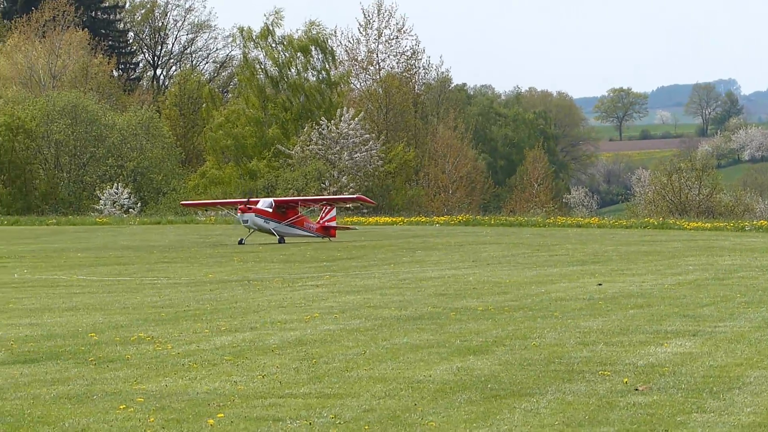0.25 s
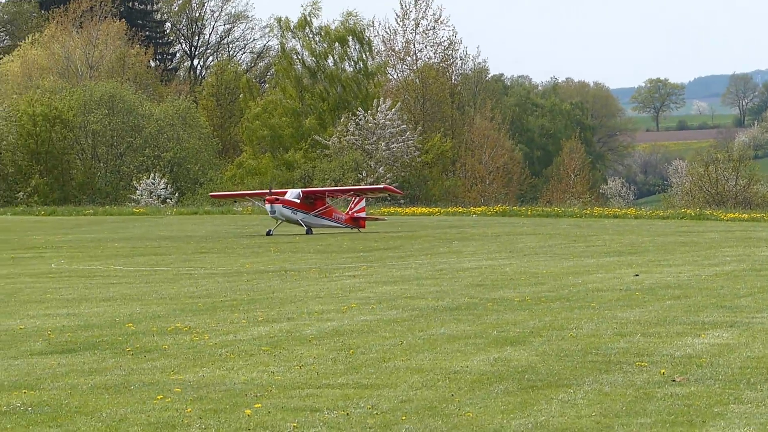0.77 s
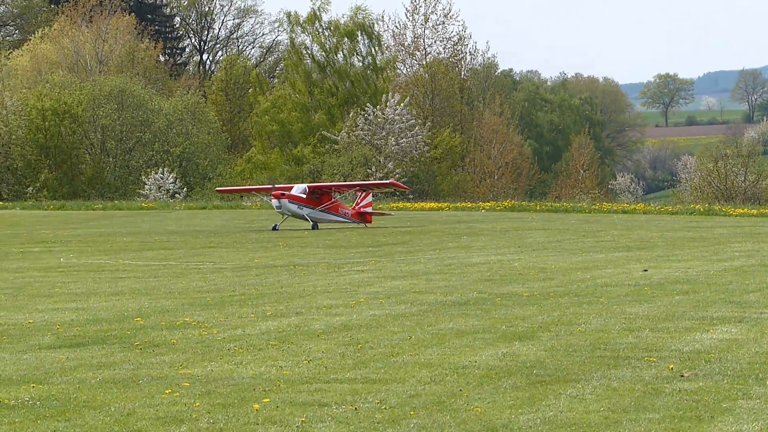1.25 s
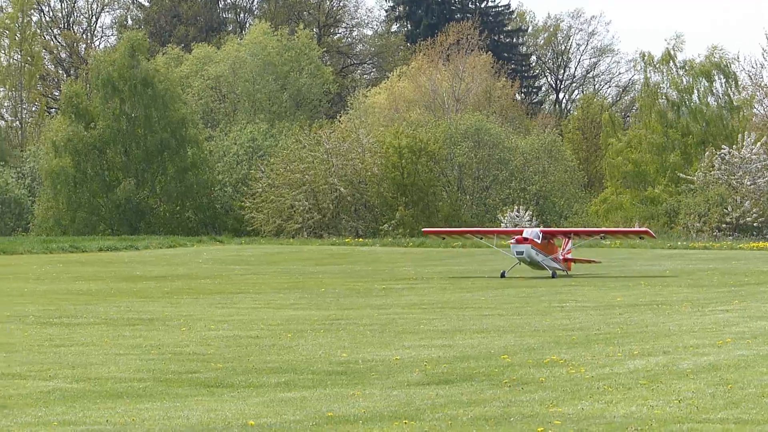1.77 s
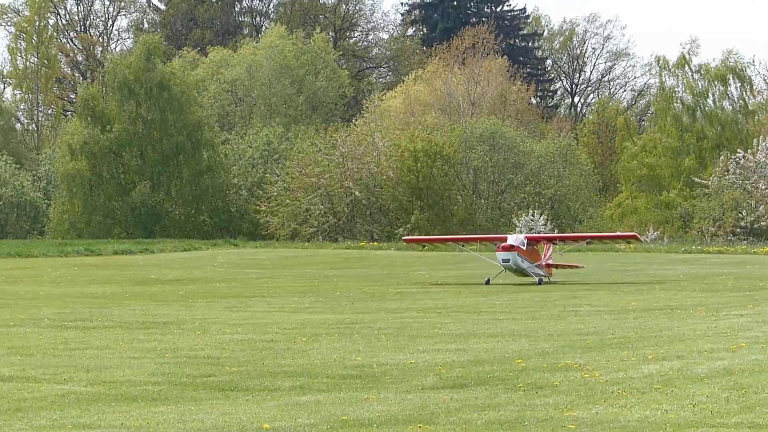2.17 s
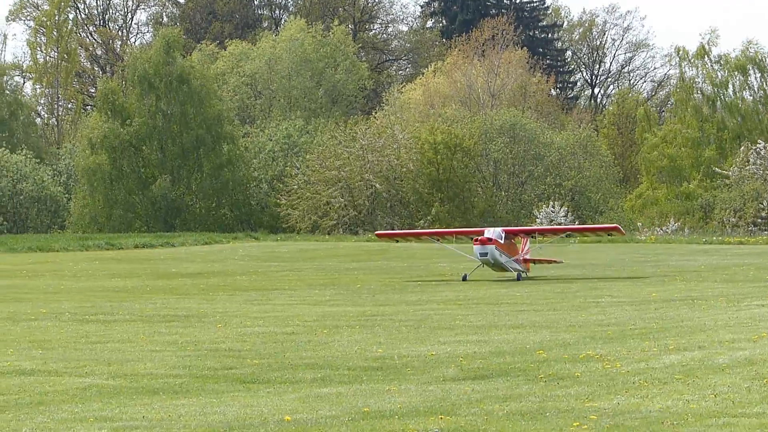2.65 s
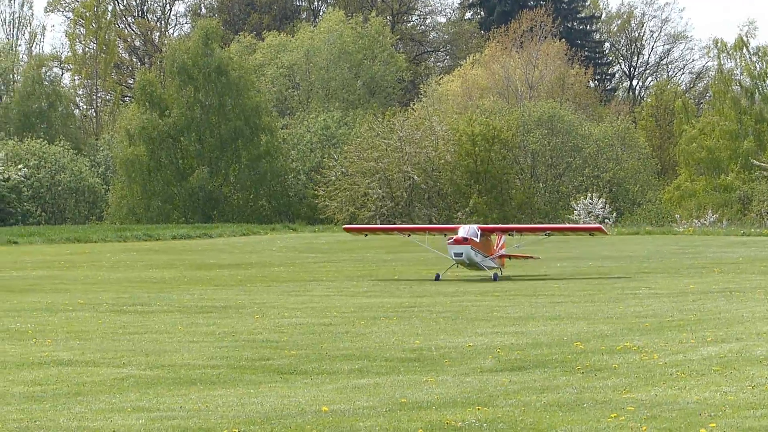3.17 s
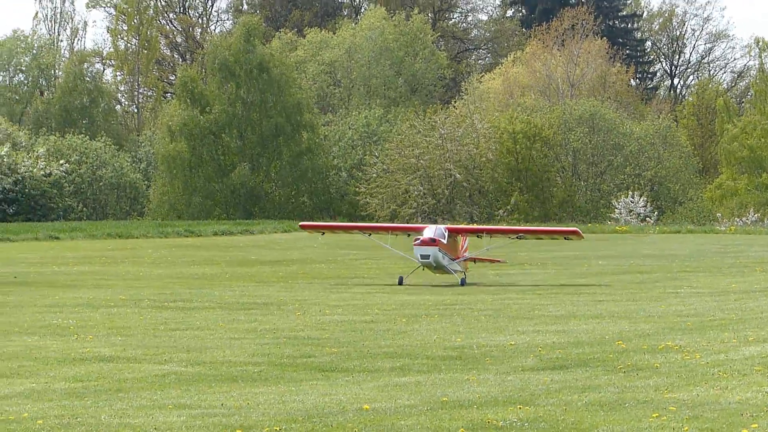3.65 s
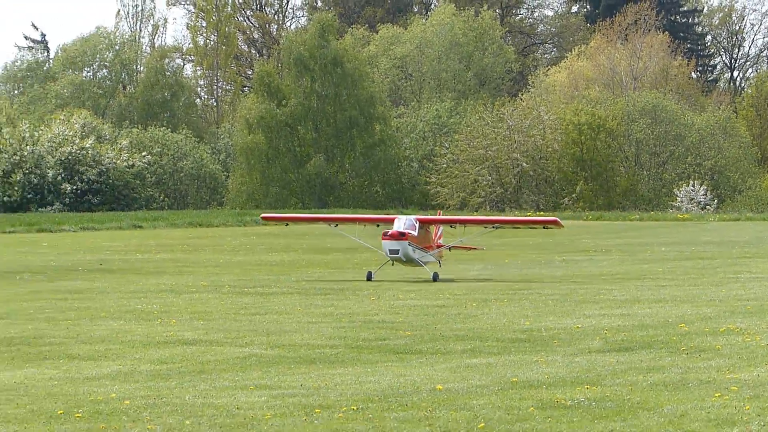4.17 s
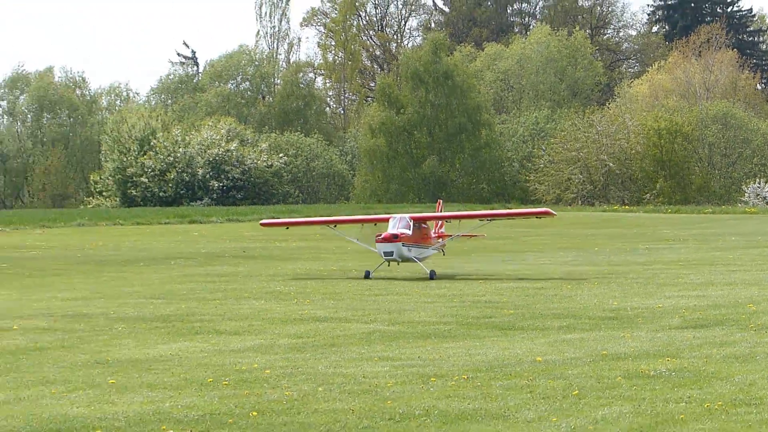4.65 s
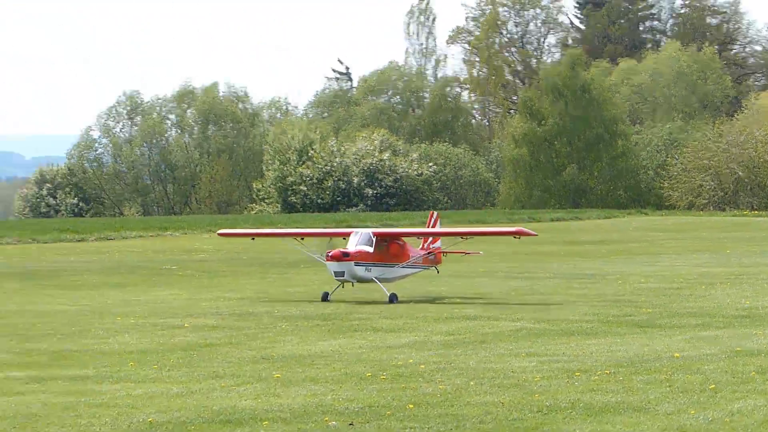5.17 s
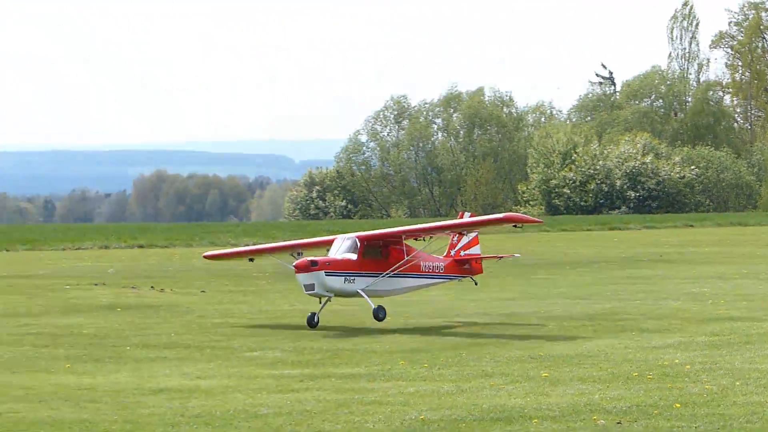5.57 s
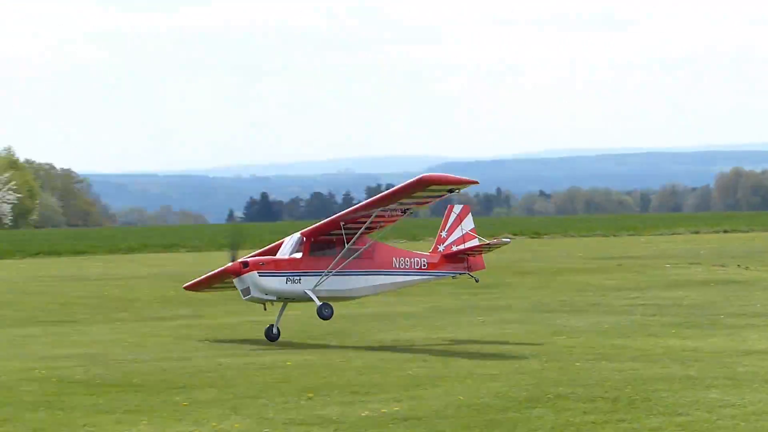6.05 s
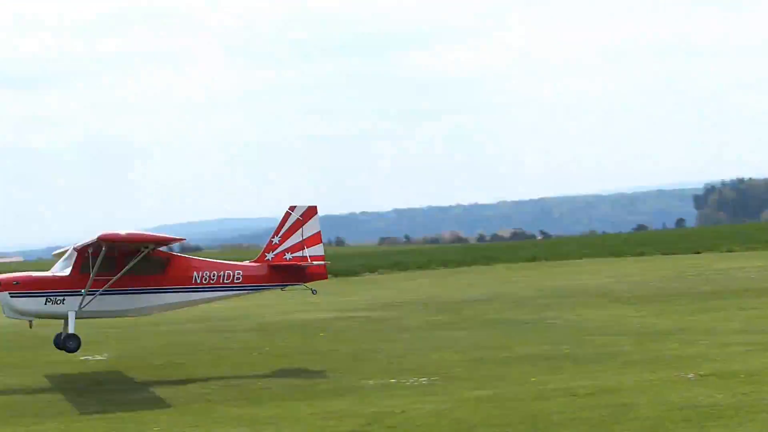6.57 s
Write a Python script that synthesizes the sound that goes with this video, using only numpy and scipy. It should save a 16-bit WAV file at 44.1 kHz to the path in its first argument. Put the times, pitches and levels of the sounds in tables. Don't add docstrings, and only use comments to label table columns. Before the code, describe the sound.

Wind gusts and sparse bird calls, a brief dead silence, then a petrol model plane revs up, swelling into a loud rasping pass.

```python
import sys
import numpy as np
from scipy import signal
from scipy.fft import rfft, irfft
from scipy.io import wavfile
from scipy.ndimage import uniform_filter1d

SR = 44100
rng = np.random.default_rng(int(sys.argv[2]) if len(sys.argv) > 2 else 0)


def how_loud(loudness_db):
    steps = np.asarray(loudness_db, float) / 20
    return 10 ** steps


def put_to_file(sound):
    columns = np.atleast_2d(sound).T
    safe = np.clip(columns, -1, 1)
    whole_steps = np.round(safe * 32767)
    wavfile.write(sys.argv[1], SR, whole_steps.astype(np.int16))


N = 300321
TIME = np.arange(N) / SR
CUT_S, RESUME_S = 1.3545, 1.6152

# time in seconds, shaft speed in turns per second.
SHAFT_SPEED = [(1.63, 49.5), (1.87, 51.1), (2.17, 54.1), (2.41, 55.3), (2.71, 58.6), (2.98, 62.9),
               (3.1, 63.7), (3.46, 64.8), (3.67, 66.9), (3.9, 70.3), (4.15, 69.9), (4.51, 70.4),
               (4.8, 72.7), (5.11, 77.3), (5.45, 85.6), (5.75, 88.3), (6.15, 89.9), (6.81, 87.6)]
# time in seconds, excess in dB.
HARD_FIRINGS = [(5.55, 3), (5.63, 4), (5.701, 6.5), (5.75, 3.5), (5.828, 6), (5.93, 4), (6.021, 4.5),
                (6.16, 2.5), (6.39, 2), (6.53, 3.5), (6.59, 0), (6.68, -0.5)]


def plane():
    speed = columns(SHAFT_SPEED, TIME)[0]
    turns = np.cumsum(speed) / SR
    bark_db = sum(db * bump(TIME, s, .02) for s, db in HARD_FIRINGS)
    firing_db = 1.4 * rng.standard_normal(600)[turns.astype(int)]
    strength = how_loud(firing_db + bark_db)
    return exhaust_orders(speed, turns, strength) + blade_hiss(turns, strength, bark_db)


# frequency in Hz, rms level of one order in dB.
ORDER_COLOUR = [(530, -34.5), (720, -45), (800, -50), (1000, -49.5), (1250, -55), (1600, -50),
                (2500, -54.5), (4000, -58.5)]
ODD_DB, ODD_BELOW_HZ = -6.5, 940
VALLEY_HZ, VALLEY_OCTAVES, VALLEY_DB = 900, .3, -4


def exhaust_orders(speed, turns, strength):
    t = TIME[::256]
    fading, flutter = drift(1.5, 14, t, count=56), drift(5, 45, t, count=56)
    wobble = drift(3, 40, t, count=1)[0]
    level_db = np.zeros((56, len(t)))
    level_db[2:11] = low_orders_db(t)
    level_db[5:11] += 2.56 * fading[5:11]
    level_db[1] = np.maximum(level_db[2] - 31, level_db[6] - 19)
    hz = np.arange(11, 56)[:, None] * speed[::256]
    level_db[11:] = read(ORDER_COLOUR, hz) + body_db(hz) + reach_db(hz, t) + 2.3
    level_db[11:] += 3 * fading[11:] + VALLEY_DB * hill(hz, VALLEY_HZ, VALLEY_OCTAVES)
    level_db[11::2] += ODD_DB * (.5 - .5 * np.tanh(np.log2(hz[::2] / ODD_BELOW_HZ) / 0.18))
    shaken = turns + .0025 * np.interp(TIME, t, wobble)
    order = np.arange(56)
    lag = .6 * order + .012 * order ** 2 + .8 * rng.standard_normal(56)
    lines = []
    for k in range(1, 56):
        level = np.interp(TIME, t, how_loud(level_db[k] + 1.06 * flutter[k]))
        lines.append(level * np.cos(2 * np.pi * k * shaken - lag[k]))
    rasp = sum(lines[12:]) * uniform_filter1d(strength, 100)
    return np.sqrt(2) * (sum(lines[:12]) + rasp)


# frequency in Hz, spectral density in dB per Hz.
HISS = [(60, -33), (130, -17), (220, -6), (400, -15), (700, -9), (950, -22.5), (1500, -13.5), (2700, -17),
        (4500, -18.5), (6000, -18.5), (9500, -18), (12000, -25.5), (15400, -35)]
# frequency in Hz, left-right likeness from -1 to 1.
HISS_SAME = [(60, 0.15), (400, 0.28), (1200, 1), (2400, 0.99), (9000, 1), (12000, 0.95)]
BARK_HZ, BARK_OCTAVES, BARK_SHARE = 1770, 0.9, 1.57


def blade_hiss(turns, strength, bark_db):
    def colour_db(hz, t):
        clear_db = -2.5 * hill(hz + 1, 1400, 1)
        snap_db = BARK_SHARE * np.interp(t, TIME, bark_db) * hill(hz + 1, BARK_HZ, BARK_OCTAVES)
        waver_db = 0.76 * drift(5, 30, t, count=1)
        return read(HISS, hz) + clear_db + body_db(hz) + reach_db(hz, t) + snap_db + waver_db
    hiss = noise(1024, colour_db, patchy_db=2.3, same=lambda hz, t: read(HISS_SAME, hz))
    firing_pulse = .55 * strength * np.exp(-(turns % 1) / .25)
    blade_pulse = .4 * np.exp(-(2 * turns % 1) / .3)
    return how_loud(-6) * hiss * evened(.9 + firing_pulse + blade_pulse)


ORDER_DB = [-20, -32, -33.5, -44.5, -40, -43, -40, -44.5, -43]
# frequency in Hz, width in Hz, gain in dB.
SILENCER = [(160.7, 15, 15), (183.9, 2.7, 10), (241.4, 13.5, 8.5), (277, 23, -0.5), (570, 57.5, 3),
            (700, 57, -2.5)]
# time in seconds, frequency in Hz, length in seconds, change in dB.
FADES = [(1.682, 203.5, 0.21, 12), (1.962, 104, 0.15, -25), (1.994, 209, 0.066, -9), (2.034, 269, 0.16, 22),
         (2.03, 470, 0.091, 16.5), (2.406, 226, 0.11, -13), (2.696, 175, 0.058, -15),
         (2.706, 567, 0.065, 7), (3.223, 550, 0.21, 10.5), (3.228, 189, 0.27, -8.5),
         (5.89, 887, 0.32, 11.5), (4.24, 500, 0.95, 4), (4.26, 632, 0.34, -3.5), (4.755, 226, 0.11, -6),
         (4.967, 450, 0.22, 7.5), (5.11, 232, 0.029, 1.5), (5.297, 337, 0.075, -13),
         (5.474, 253, 0.031, -18), (5.45, 600, 0.064, 5.5), (5.795, 683, 0.44, -6), (5.905, 614, 0.13, -25),
         (6.14, 263.5, 0.39, -33), (6.717, 263, 0.1, -2.5), (6.746, 175, 0.28, -12), (6.65, 548, 0.43, 5),
         (6.687, 737, .2, 5), (6.75, 440, 0.22, -11), (3.723, 272, 0.087, 3.5), (6.65, 620, 0.19, 2.5),
         (3.3, 440, .4, -11)]
FADE_OCTAVES = .08
THUMP_DB_PER_OCTAVE, FULL_SPEED = 17, 92
CARRY = 0.68
SILENCER_TOP_HZ, SILENCER_CUT_DB = 710, -8.5


def low_orders_db(t):
    t = np.asarray(t)
    speed, near_db = columns(SHAFT_SPEED, t)[0], columns(PATH, t)[0]
    hz = np.arange(2, 11)[:, None] * speed
    thump_db = THUMP_DB_PER_OCTAVE * np.log2(speed / FULL_SPEED)
    source_db = np.vstack([thump_db, peaks_db(SILENCER, hz[1:])])
    source_db += SILENCER_CUT_DB * (.5 + .5 * np.tanh(np.log2(hz / SILENCER_TOP_HZ) / .05))
    echo_db = sum(db * bump(t, s, length) * hill(hz, f, FADE_OCTAVES) for s, f, length, db in FADES)
    return np.array(ORDER_DB)[:, None] + source_db + CARRY * near_db + echo_db


# frequency in Hz, width in Hz, gain in dB.
BODY = [(1277, 100, -2.5), (1970, 450, -0.5), (2520, 110, 3), (3090, 34, -2), (3724, 77, 0), (4133, 150, 5),
        (5190, 740, 3), (7300, 280, -8.5), (8640, 3100, -12)]


def body_db(hz):
    return peaks_db(BODY, hz)


# time in seconds, nearness in dB, clear sight of the blades in dB,
# ground dip in octaves over 1 kHz.
PATH = [(1.7, -29.5, 0.5, 1.3), (2.1, -25, -8, 0.4), (2.45, -27.5, -5.5, 1.2), (2.7, -21.5, -6.5, 1.15),
        (3.0, -20, -4, 1.77), (3.5, -17, -3.5, 1.1), (3.9, -12.5, -3, 1.06), (4.12, -13.5, -7.5, 1.47),
        (4.35, -12.5, -4.5, 0.15), (4.65, -12, 6.5, 0.46), (4.9, -6.5, 5.5, 0.72), (5.1, -4.5, -1, 0.52),
        (5.25, -3, 2, 0.72), (5.45, -1.5, -1.5, 0.2), (5.8, 0, 0, 0), (6.15, 0, -1, -0.02),
        (6.5, 3.5, -3, -0.11), (6.8, 3.5, -6, -0.8)]
PASS_S, LOW_HZ, HIGH_HZ = 6.2, 400, 850
SIGHT_HZ, SIGHT_OCTAVES, DIP_DB, DIP_OCTAVES = 2380, 1, -5.5, 0.54
COWL_HZ, COWL_OCTAVES, COWL_DB, COWL_FROM_S, TAIL_UP_S, TURN_S = 1240, .14, 7, 2.3, 4.24, .06
SHADE_HZ, SHADE_OCTAVES, SHADE_DB = 2900, 0.18, -4
ABEAM_S, ABEAM_LENGTH_S, STUB_HZ, STUB_OCTAVES, STUB_DB = 6.62, 0.28, 1490, 0.13, 4.5


def path_db(hz, t):
    t = np.asarray(t)
    near_db, sight_db, dip = columns(PATH, t)
    seen = .5 + .5 * np.tanh(np.log2((hz + 1) / SIGHT_HZ) / SIGHT_OCTAVES)
    high_db = near_db + seen * sight_db + DIP_DB * hill(hz + 1, 1000 * 2 ** dip, DIP_OCTAVES)
    facing = .5 * (np.tanh((t - COWL_FROM_S) / TURN_S) - np.tanh((t - TAIL_UP_S) / TURN_S))
    high_db = high_db + COWL_DB * facing * hill(hz + 1, COWL_HZ, COWL_OCTAVES)
    high_db = high_db + SHADE_DB * facing * hill(hz + 1, SHADE_HZ, SHADE_OCTAVES)
    abeam = bump(t, ABEAM_S, ABEAM_LENGTH_S)
    high_db = high_db + STUB_DB * abeam * hill(hz + 1, STUB_HZ, STUB_OCTAVES)
    low_db = 10 * np.log10((how_loud(low_orders_db(t)) ** 2).sum(0))
    share = np.clip(np.log((hz + 1) / LOW_HZ) / np.log(HIGH_HZ / LOW_HZ), 0, 1)
    return share * high_db + (1 - share) * low_db


def reach_db(hz, t):
    return path_db(hz, t) - path_db(hz, [PASS_S])


# frequency in Hz, left-right difference in dB.
LEAN = [(60, 17), (110, 0), (200, 9.5), (380, 5), (700, -2.5), (1290, -2), (2370, -1.5), (4380, 2),
        (8090, -2), (14900, 4)]
# frequency in Hz, lead of the left in radians.
LEAD = [(0, 1), (430, -0.95), (1380, -0.5), (2070, -0.35), (2330, -0.0), (15100, -0.0)]


def ports(x):
    hz = np.fft.rfftfreq(N, 1 / SR)
    left = how_loud(read(LEAN, hz) / 2) * np.exp(.5j * read(LEAD, hz))
    pair = 2 * np.array([left, 1 / left]) / (left + 1 / left)
    return irfft(rfft(x) * pair, N)


# time in seconds, length in seconds, thud in dB, flap over thud in dB.
GUSTS = [(.01, 0.14, -48, 4), (0.131, 0.18, -32, -2.5), (.3, 0.12, -41, -3.5), (0.745, 0.11, -39, -9),
         (0.897, 0.27, -43.5, -5), (1.034, 0.15, -34.5, -7), (1.126, .06, -41, -14),
         (1.184, 0.043, -33, 0.5), (0.698, .04, -42, -13), (1.26, 0.12, -30.5, -2), (1.321, 0.05, -42, 9)]
# frequency in Hz, spectral density in dB per Hz.
GUST_COLOUR = [(40, -42), (90, -23), (140, -4), (220, 0), (330, -10), (550, -15.5), (900, -23.5),
               (1800, -47), (4000, -65)]
# time in seconds, length in seconds, level in dB.
PUFFS = [
    (1.043, 0.14, -64),
    (1.274, 0.18, -56.5),
    (1.608, 0.034, -15),
    (1.68, .03, -33),
    (1.755, 0.093, -40),
    (1.877, .04, -34),
    (2.29, 0.038, -35),
    (2.4, .035, -33),
    (2.654, 0.053, -36),
    (6.732, .2, -26.5),
]
LULL_DB = -64


def wind():
    def gust_db(hz, t):
        high = np.clip(np.log2((hz + 1) / 160), -1, 1)
        blow = how_loud(LULL_DB)
        for s, length, db, flap_db in GUSTS:
            blow = blow + how_loud(db + high * flap_db) * bump(t, s, length / 2)
        return read(GUST_COLOUR, hz) + 20 * np.log10(blow) + 3.2 * drift(12, 50, t, count=1)

    def puff_db(hz, t):
        return read(GUST_COLOUR, hz) - 4.2 * np.log2(1 + hz / 250) + 2.5 * drift(10, 50, t, count=1)
    gusts = how_loud(22.0) * noise(512, gust_db, patchy_db=1.0) * (TIME < CUT_S)
    push = sum(how_loud(db) * bump(TIME, s, length / 2) for s, length, db in PUFFS)
    puffs = evened(noise(512, puff_db, patchy_db=-1.0)) * push
    bass_cut = signal.butter(2, 95, "highpass", fs=SR, output="sos")
    return signal.sosfilt(bass_cut, gusts + np.array([1.1 * puffs, -puffs]))


# time in seconds, pitch in Hz, level in dB.
BIRD_NOTES = [
    [(0.015, 3900, -50), (0.077, 3080, -41), (0.17, 2900, -68)],
    [(0.135, 4123, -66), (0.173, 3670, -66), (0.27, 4208, -65)],
    [(0.188, 2358, -59), (0.198, 2580, -52), (0.212, 2575, -53)],
    [(0.212, 2240, -48.5), (0.238, 2290, -48.5), (0.28, 1860, -66)],
    [(0.35, 1400, -58), (0.364, 1485, -55), (0.42, 1170, -71)],
    [(0.81, 1420, -72), (0.838, 1430, -58), (0.86, 1385, -76)],
    [(0.31, 574, -67), (0.352, 544, -55), (0.4, 544, -62)],
    [(0.37, 706, -59), (0.388, 700, -59), (0.43, 670, -70)],
    [(1.04, 510, -75), (1.06, 502, -40.5), (1.08, 472.9, -75)],
]


def birds():
    out = np.zeros(N)
    for rows in BIRD_NOTES:
        span = slice(round(rows[0][0] * SR), round(rows[-1][0] * SR))
        hz, db = columns(rows, TIME[span])
        hz = uniform_filter1d(hz, 400)
        tone = np.sin(2 * np.pi * np.cumsum(hz) / SR)
        out[span] += np.sqrt(2) * how_loud(db) * tone * signal.windows.tukey(len(hz), .3)
    out[:2 * SR] *= how_loud(3.1 * drift(30, 120, TIME[:2 * SR], count=1)[0])
    t = TIME[:12000]
    echoes = rng.standard_normal(len(t)) * how_loud(-60 * t / 0.41) * (t > .01)
    return out + how_loud(-8) * signal.oaconvolve(out, echoes / np.linalg.norm(echoes))[:N]


# frequency in Hz, spectral density in dB per Hz.
FIELD = [(24, -62), (40, -57), (146, 11), (426, -8.5), (619, -3), (775, -4.5), (922, -8.5), (2050, -11),
         (2380, -11), (3200, -17), (5410, -16), (15400, -37)]
# frequency in Hz, left-right likeness from -1 to 1.
FIELD_SAME = [(60, 0.65), (300, 0.99), (900, -0.44), (2000, 0.45), (3000, 0.67), (7000, 0.79)]
# time in seconds, lift in dB.
RUSTLES = [
    (.18, 6.5),
    (1.3, 3.5),
    (2.045, 8),
]
FIELD_DB = -50


def field():
    def likeness(hz, t):
        return np.where(t < CUT_S, 1, read(FIELD_SAME, hz))

    def colour_db(hz, t):
        return read(FIELD, hz) + (hz > 4500) * sum(db * bump(t, s, .025) for s, db in RUSTLES)
    hiss = evened(noise(1024, colour_db, patchy_db=-0.5, same=likeness))
    return how_loud(FIELD_DB + 4.7 * (TIME > CUT_S)) * hiss


def noise(size, field_db, patchy_db, same=None):
    hop = size // 4
    t, hz = np.arange(N // hop + 5) * hop / SR, np.fft.rfftfreq(size, 1 / SR)[:, None]
    a, b, c, d, patches = rng.standard_normal((len(t), len(hz), 5)).T
    patches = uniform_filter1d(patches, size // 200, 0)
    patches = evened(uniform_filter1d(patches, 5000 // hop, 1))
    z = a + 1j * b
    if same:
        like = np.clip(same(hz, t), -1, 1)
        z = np.array([z, like * z + np.sqrt(1 - like ** 2) * (c + 1j * d)])
    z = z * how_loud(field_db(hz, t) + patchy_db * patches) / np.sqrt(size)
    return signal.istft(z, nperseg=size, noverlap=size - hop)[1][..., :N]


def drift(low, rate, t, count):
    f = np.geomspace(low, rate, num=24)[:, None]
    sines = np.sin(2 * np.pi * (f * t + rng.random((count, 24, 1))))
    return evened((sines / np.sqrt(f)).sum(1))


def peaks_db(table, hz):
    lift = sum(how_loud(db) / (1 + (2 * (hz - f) / width) ** 2) for f, width, db in table)
    return 20 * np.log10(1 + lift)


def bump(x, centre, width):
    return np.exp(-((x - centre) / width) ** 2)


def hill(hz, centre_hz, octaves):
    return bump(np.log2(hz / centre_hz), 0, octaves)


def evened(x):
    return x / np.sqrt(np.mean(abs(x) ** 2) + 1e-20)


def read(points, hz):
    f, value = np.transpose(points)
    return np.interp(np.log(hz + 1), np.log(f + 1), value)


def columns(rows, t):
    s, *values = np.transpose(rows)
    return np.array([np.interp(t, s, v) for v in values])


def scene():
    return ports(plane() * (TIME > RESUME_S)) + field() + wind() + birds()


def top_cut(x):
    return signal.sosfilt(signal.butter(12, 15540, fs=SR, output="sos"), x)


def record(dry):
    dry = signal.sosfilt(signal.butter(2, [75, 14000], "bandpass", fs=SR, output="sos"), dry)
    live = (TIME < CUT_S) | (TIME > RESUME_S)
    offset = -how_loud(-50) * np.exp(-(TIME - RESUME_S) / .3) * (TIME > RESUME_S)
    return top_cut(dry * live + offset)


dry = scene()
out = record(dry)
put_to_file(out)
```